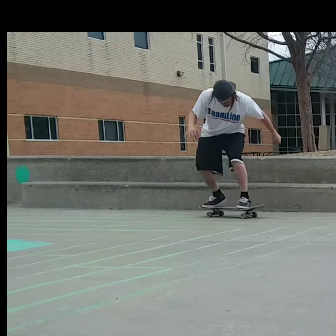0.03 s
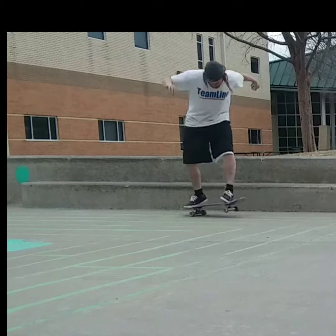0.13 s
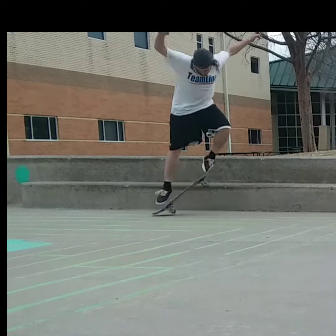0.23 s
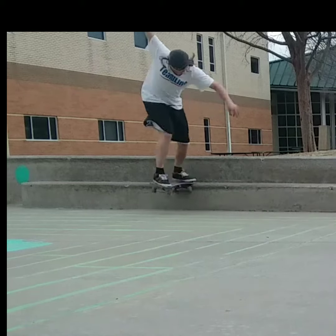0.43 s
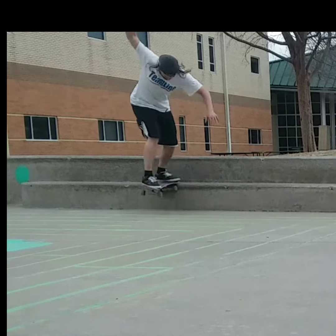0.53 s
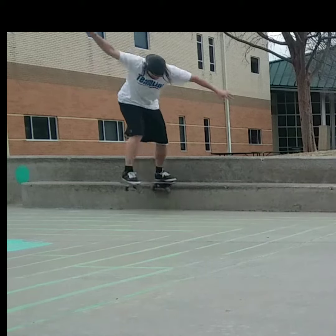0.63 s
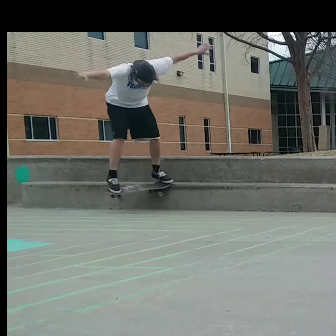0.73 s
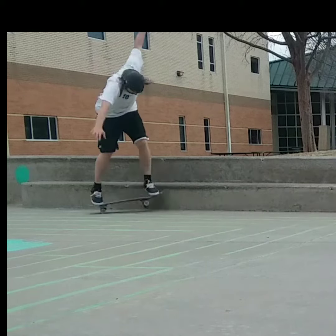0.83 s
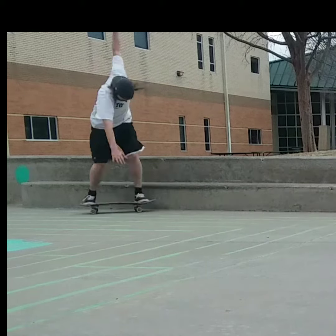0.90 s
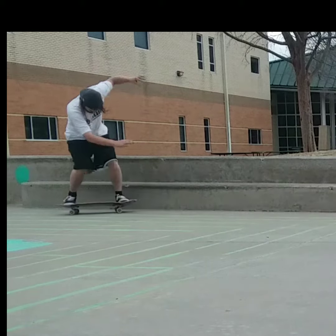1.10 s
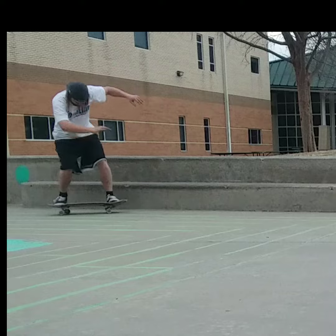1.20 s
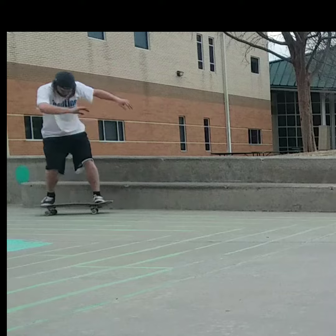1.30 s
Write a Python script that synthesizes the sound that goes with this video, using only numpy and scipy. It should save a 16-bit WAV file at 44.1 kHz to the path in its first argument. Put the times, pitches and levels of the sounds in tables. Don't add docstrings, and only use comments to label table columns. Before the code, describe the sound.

Skateboard trick: short gritty roll, a burst of loud wooden cracks, then a softer landing clatter.

```python
import sys
import numpy as np
from scipy import signal
from scipy.fft import rfft, irfft, next_fast_len
from scipy.io import wavfile
from scipy.ndimage import uniform_filter1d, minimum_filter1d, map_coordinates

SR = 44100
rng = np.random.default_rng(int(sys.argv[2]) if len(sys.argv) > 2 else 0)


def inscribe(sig):
    pcm = np.round(np.clip(np.atleast_2d(sig).T, -1, 1) * 32767)
    wavfile.write(sys.argv[1], SR, pcm.astype(np.int16))


def rack_gain(trim_db):
    fader = np.asarray(trim_db, float)
    return 10 ** (fader / 20)


N = 59535


def unit(x):
    return x / np.sqrt(np.mean(x ** 2) + 1e-20)


def along(points, hz):
    f, v = np.transpose(points)
    return np.interp(np.log(hz + 1), np.log(f + 1), v)


def curve(rows):
    s, v = np.transpose(rows)
    return np.interp(np.arange(N) / SR, s, v)


def wobble(rate):
    return map_coordinates(rng.standard_normal(400), [np.arange(N) * rate / SR])


def filtered(x, response):
    n = x.shape[-1]
    m = 2 * next_fast_len(n // 2 + 4096)
    return irfft(rfft(x, m) * response(np.fft.rfftfreq(m, 1 / SR)), m)[..., :n]


def causal(points):
    def response(hz):
        cepstrum = irfft(np.log(rack_gain(along(points, hz))))
        half = len(cepstrum) // 2
        fold = np.r_[1, 2 * np.ones(half - 1), np.zeros(half)]
        return np.exp(rfft(cepstrum * fold))
    return response


def peak(f, centre, width):
    return 1j * f * width / (centre * centre - f * f + 1j * f * width)


def resonances(f, rows):
    total = 0
    for k, (centre, width, db) in enumerate(rows):
        total = total + (-1) ** k * rack_gain(db) * peak(f, centre, width)
    return total


def softness(f):
    return 1 / (1 + 1j * f / 3000)


def rush(spectrum, alike, mono_hz=0):
    mid, side = rng.standard_normal((2, N))
    angle = np.arccos(np.clip(alike, 0, 1)) / 2
    side = filtered(side, lambda hz: (hz + 1) ** 2 / ((hz + 1) ** 2 + mono_hz ** 2))
    mid, side = np.cos(angle) * mid, np.sin(angle) * side
    pair = np.array([mid + side, mid - side])
    return unit(filtered(pair, lambda hz: rack_gain(along(spectrum, hz))))


# start in seconds, peak in dB, struck deck
# region in Hz, crack brightness in dB, chatter in seconds.
LEDGE_BLOWS = [(.268, -32, 1500, 21, 0.023), (0.4065, -10, 1300, 14, 0.0043), (.416, -17, 400, -32, 0.041),
               (.471, -22, 452, -32, 0.015), (.476, -14.5, 1000, -17, 0.007), (.4140, -2, 1155, 1, .02),
               (0.429, -12, 1020, 0.5, 0.025), (0.44, -16.5, 1260, 8, 0.019),
               (0.455, -30.5, 1450, 16.5, 0.036), (0.464, -14, 1800, 1, 0.021), (0.4706, -5, 1185, 6, .02),
               (.481, -22, 1430, 24, 0.004), (.486, -3, 1950, -15, 0.0095), (.503, -28, 1200, 28, 0.0057),
               (0.506, -14, 1080, -28, 0.002), (.520, -27, 2020, -17, 0.013),
               (0.5315, -11, 1306, -35, .014), (0.5326, -10, 2150, -33, 0.0067),
               (0.544, -17, 1950, -20, .012), (0.557, -19.5, 1220, 2, 0.034), (0.6, -34, 1810, 17.5, 0.012),
               (0.65, -35, 1390, -42, .01)]
LANDING_BLOWS = [(0.8609, -20, 1200, 10, 0.027), (.862, -12, 210, -28, 0.011),
                 (0.867, -16.5, 414, -25, 0.018), (.8932, -11.5, 1077, 10, 0.0033),
                 (.896, -19, 583, -24, 0.019), (0.9258, -18, 1270, 10.5, 0.011),
                 (0.9263, -10.5, 496, -36, 0.013), (.936, -10.5, 980, 1.5, 0.01),
                 (0.983, -33, 1210, -12, 0.012), (1.001, -29.5, 1400, -20, 0.019),
                 (1.006, -24.5, 780, -33, .018), (1.0435, -32, 583, -46, 0.004)]
# centre in Hz, width in Hz, level in dB.
DECK_MODES = [(210, 184, -9.5), (376, 315, -2), (528, 215, 0), (780, 115, 0), (980, 100, 4.5),
              (1200, 218, 3.5), (1400, 352, 3.5), (1950, 147, 3), (2310, 230, 0), (3740, 1800, -5.5)]
# frequency in Hz, level in dB.
CRACK_COLOUR = [(300, -13), (1500, 4.5), (3000, 1), (6000, -17), (9000, -32.5), (12000, -35), (16000, -36)]


def board_blows():
    chatter_per_s, chatter_db = 1100, -1.5
    struck_q, off_region_db = 5.86, -15
    out = np.zeros((2, N + SR))
    t = np.arange(4096) / SR
    for start_s, db, region_hz, bright_db, chatter_s in LEDGE_BLOWS + LANDING_BLOWS:
        chance, size = rng.random(len(t)), rng.standard_normal(len(t))
        grit = rng.standard_normal((3, len(t)))
        fade = rack_gain(-30 * (t / chatter_s) ** 1.4)
        blows = rack_gain(chatter_db) * (chance < chatter_per_s / SR) * np.tanh(size) * fade
        blows[0] = -1

        def struck_deck(f):
            region = peak(f, region_hz, region_hz / struck_q)
            elsewhere = rack_gain(off_region_db) * peak(f, 890, 2000)
            return resonances(f, DECK_MODES) * (region + elsewhere) * softness(f) ** 4

        ring = filtered(blows, struck_deck)
        attack = 1 - np.exp(-t / 0.00021)
        stereo_grit = grit[0] + 0.36 * grit[1:]
        crack = filtered(0.22 * fade * attack * stereo_grit, causal(CRACK_COLOUR))
        hit = rack_gain(db - 1.5) * (ring / abs(ring).max() + rack_gain(bright_db) * crack)
        out[:, round(start_s * SR):][:, :len(t)] += hit
    return out[:, :N]


def ground_scatter(hits):
    u = np.arange(SR // 10) / SR
    near = rng.standard_normal((2, len(u))) * rack_gain(-60 * u / .022)
    near = near * (rng.random((2, len(u))) < .05)
    near = near / np.linalg.norm(near, axis=1)[:, None]
    return rack_gain(-7) * signal.fftconvolve(hits, near, axes=1)[:, :N]


# frequency in Hz, time to fall 60 dB in seconds.
YARD_DECAY = [(200, 0.3), (1200, 0.18), (4000, 0.7), (12000, 0.58)]


def yard(x):
    wall_s, wall_smear_s, wall_hz = .117, .025, 3500
    yard_db, wall_db = -8, -21
    hz, t, z = signal.stft(rng.standard_normal((2, SR // 2)), SR, nperseg=256)
    decay = rack_gain(-60 * t / along(YARD_DECAY, hz)[:, None])
    tail = signal.istft(z * decay, SR, nperseg=256)[1]
    u = np.arange(tail.shape[1]) / SR - wall_s
    slap = rng.standard_normal(tail.shape) * (u > 0) * rack_gain(-60 * abs(u) / wall_smear_s / 3)
    slap = filtered(slap, lambda f: 1 / (1 + 1j * f / wall_hz))
    answer = rack_gain(yard_db) * tail / np.linalg.norm(tail[0]) + rack_gain(wall_db) * slap / np.linalg.norm(slap[0])
    return signal.fftconvolve(x[None], answer, axes=1)[:, :N]


# time in seconds, level in dB.
SCRAPE_LEVEL = [(0, -40), (.12, -44), (.17, -37.5), (.245, -31.5), (.262, -38), (.40, -38), (.46, -28),
                (.57, -41.5), (.62, -48.5), (.66, -48), (.72, -50.5), (.85, -50.5), (.96, -86),
                (1.03, -37.5), (1.09, -50.5), (1.14, -54), (1.35, -54)]
# frequency in Hz, level in dB per Hz.
GRIT_COLOUR = [(120, -26.5), (200, -9.5), (305, -8), (529, -3), (590, -6), (1270, -8.5), (2380, -21.5),
               (14900, -65), (16000, -56)]
# centre in Hz, width in Hz, level in dB.
ROLLING_MODES = [(520, 250, -2), (705, 106, 1.5), (1260, 380, 3), (1950, 570, 1)]


def scrape():
    grains_per_s, knocks_db = 900, -6.5
    level_db = curve(SCRAPE_LEVEL)
    grains = (rng.random(N) < grains_per_s / SR) * rng.standard_normal(N)
    knocks = filtered(grains, lambda f: resonances(f, ROLLING_MODES) * softness(f) ** 2)
    noise = rush(GRIT_COLOUR, 0.13, mono_hz=500)
    fizz = filtered(noise, lambda hz: hz ** 2 / (hz ** 2 + 3000 ** 2))
    swing_db = level_db - level_db.mean()
    tilted = noise - fizz + rack_gain(-0.04 * swing_db) * fizz
    flutter_db = 1.2 * wobble(60)
    return rack_gain(level_db + flutter_db) * (tilted + rack_gain(knocks_db) * unit(knocks))


# time in seconds, level in dB.
HISS_LEVEL = [(0, -69), (.25, -60.5), (.4, -64.5), (.56, -51), (.62, -79), (.7, -99), (.85, -84),
              (.97, -66), (1.06, -68), (1.14, -85), (1.35, -88)]
# frequency in Hz, level in dB per Hz.
HISS_COLOUR = [(1500, -18), (3000, 4), (6000, 6.5), (9000, -19), (13000, -8), (16000, -16)]


def hiss():
    return rack_gain(curve(HISS_LEVEL)) * rush(HISS_COLOUR, 0.48)


# time in seconds, level in dB.
GUST_LEVEL = [(0.0, -45), (0.112, -43), (0.218, -50.5), (0.248, -39.5), (0.394, -46.5), (0.488, -40),
              (0.522, -40), (0.626, -41), (0.654, -57), (0.688, -38), (0.762, -51), (0.936, -55.5),
              (0.962, -43), (1.006, -51), (1.026, -48), (1.094, -64), (1.206, -52.5), (1.35, -55)]
# frequency in Hz, level in dB per Hz.
WIND_COLOUR = [(25, -50), (45, -16), (65, -3.5), (110, 1), (160, -5.5), (250, -13), (400, -20.5),
               (800, -89)]


def wind():
    shared = 0.83 * wobble(25.2)
    apart = 0.68 * np.array([wobble(14), wobble(14.3)])
    lumps = rack_gain(shared + apart)
    return rack_gain(curve(GUST_LEVEL) + 3.93) * unit(lumps * rush(WIND_COLOUR, .4))


# frequency in Hz, level in dB per Hz.
TOWN_COLOUR = [(120, -29), (200, -0.5), (283, -32), (448, -12), (538, -18), (1560, -22.5), (1810, -18.5),
               (16000, -85)]


def town():
    return rack_gain(-56) * rush(TOWN_COLOUR, 0.13, mono_hz=500)


def scene():
    hits = board_blows()
    hits = hits + ground_scatter(hits)
    return hits + yard(hits.mean(0)) + scrape() + wind() + town() + hiss()


def low_pass(x):
    return signal.sosfilt(signal.butter(12, 16420, fs=SR, output="sos"), x)


# frequency in Hz, level in dB.
RIGHT_PORT = [(60, -7), (200, -3), (700, .5), (1290, 6.5), (2380, 3), (4400, -6), (8120, -17), (15000, -20)]


def record(dry):
    top_hz, right_late_s = 15700, .00018
    ceiling, limit_samples = .93, 133
    port = causal([(hz, db / 2) for hz, db in RIGHT_PORT])

    def ports(hz):
        late = np.exp(-2j * np.pi * hz * right_late_s)
        colour = port(hz)
        return (hz < top_hz) * np.array([1 / colour, colour * late])

    pair = filtered(dry, ports)
    need = np.minimum(1, ceiling / (abs(pair).max(0) + 1e-9))
    held = minimum_filter1d(need, size=2 * limit_samples)
    gain = uniform_filter1d(held, size=limit_samples)
    return low_pass(pair * gain)


dry = scene()
out = record(dry)
inscribe(out)
```